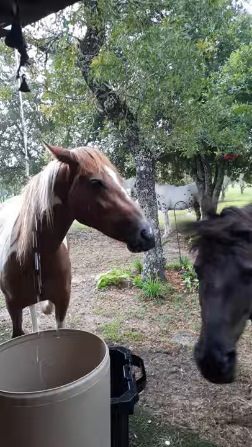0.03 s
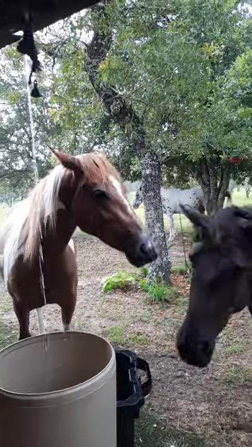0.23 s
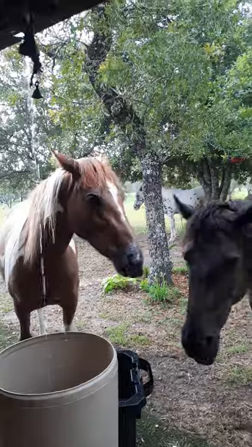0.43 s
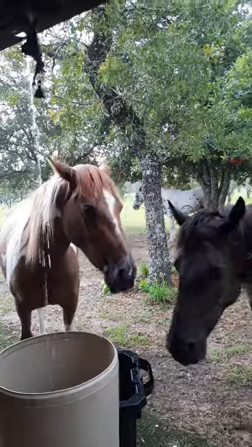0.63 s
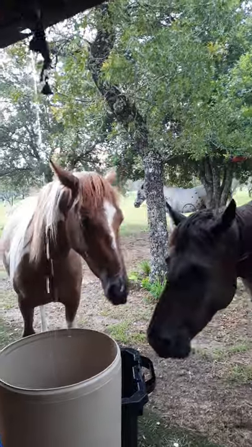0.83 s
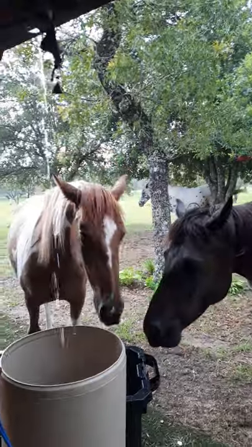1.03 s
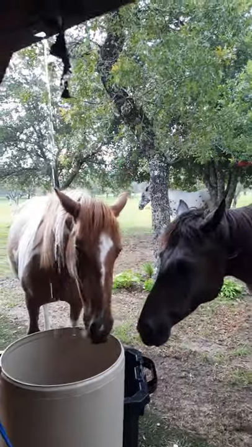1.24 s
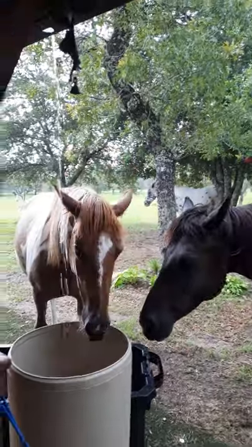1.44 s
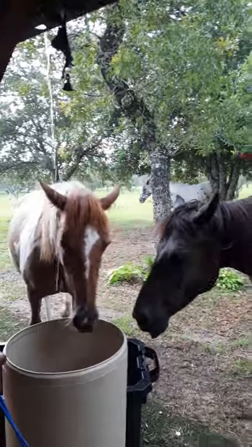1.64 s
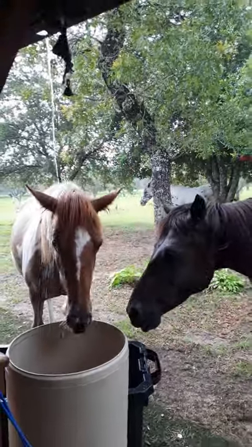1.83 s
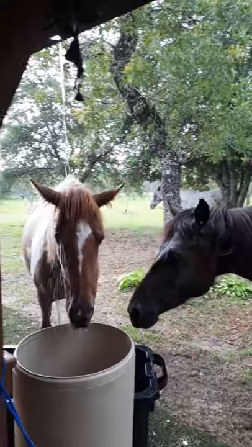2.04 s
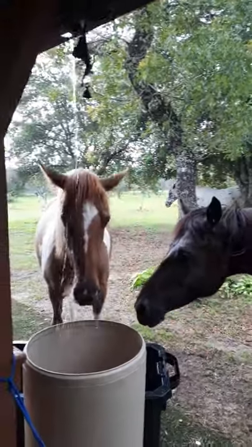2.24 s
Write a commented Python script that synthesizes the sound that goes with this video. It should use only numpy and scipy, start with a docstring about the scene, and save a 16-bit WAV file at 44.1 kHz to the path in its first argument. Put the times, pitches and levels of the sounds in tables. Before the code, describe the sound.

A thin stream of water pours into a plastic barrel, spattering and gurgling over a low, hollow drumming. Midway, a hand knocks twice and rubs beside the left microphone. The splashing thins near the end, in a quiet yard.

```python
"""A thin stream of rainwater falls from a roof into a plastic barrel, which drums under it.
Heard in a wet yard on a hand-held phone, in stereo. The stream breaks into spatters, splashes ring
the barrel, tiny bubbles ping and a few air pockets gulp; near the end the splashing thins out.
Right beside the left microphone, the duller of the two, the hand rubs and knocks twice."""
import sys
import numpy as np
from scipy import signal
from scipy.fft import rfft, irfft
from scipy.io import wavfile
from scipy.ndimage import map_coordinates

SR = 44100
rng = np.random.default_rng(int(sys.argv[2]) if len(sys.argv) > 2 else 0)


def persist_wave(psi):
    """Save psi, clipped to +-1, as 16-bit WAV."""
    counts = np.round(np.clip(psi, -1, 1) * 32767).astype(np.int16)
    wavfile.write(sys.argv[1], SR, np.atleast_2d(counts).T)


N = 101429

# the barrel sounding under the stream: time_s, boom_db, drum_db
DRUMMING_LEVELS = [(.07, -43.5, -45), (.3, -41, -44.5), (.55, -41.5, -45), (.7, -39.5, -42.5),
                   (.9, -39.5, -41.5), (1.1, -42, -45.5), (1.27, -48.5, -48), (1.38, -45.5, -39.5),
                   (1.55, -45, -47.5), (1.76, -44.5, -46.5), (1.83, -44, -45.5), (2.02, -43.5, -47.5),
                   (2.15, -42.5, -45.5), (2.3, -49, -46.5)]
# its deep boom and its higher drumming: frequency_hz, gain_db
BOOM_SPECTRUM = [(25, -27), (45, -7.5), (60, -11), (80, -4), (112, -3), (150, -9.5), (195, -6.5),
                 (235, -16.5), (400, -47)]
DRUM_SPECTRUM = [(120, -29), (200, -5.5), (255, 0.5), (315, 5.5), (360, -4), (392, -0.5), (450, -7.5),
                 (640, -15), (1000, -22), (2000, -71)]
# ringing modes of the barrel: pitch_hz, lift_db, t60_s
BARREL_MODES = [(658, 7, 0.12), (915, -7, .031), (1708, 9, 0.19), (1745, -11, 0.049), (1962, 1.5, 0.085),
                (2250, -40, 0.15), (2560, 3.5, 0.088), (2900, -31, 0.15), (3390, -2.5, 0.068),
                (4660, -7, 0.067), (5750, -4, 0.059), (6635, -2.5, 0.052)]
# strength of the stream's splashing: time_s, level_db
FLOW_LEVELS = [(.07, -39), (.4, -37.5), (.8, -37.5), (.93, -38.5), (1.08, -39.5), (1.4, -37), (1.49, -38.5),
               (1.6, -35), (1.78, -38), (1.88, -39), (1.97, -49.5), (2.3, -49.5)]
# patter of its small drops: frequency_hz, gain_db
STREAM_SPECTRUM = [(200, -7), (500, -7), (850, -0.5), (1250, 1), (1800, 1), (2500, -1.5), (3500, -4.5),
                   (5000, -2.5), (6700, -1), (9500, -11.5), (13000, -1.5), (16000, -3.5)]
# blobs bursting into droplets: start_s, level_db, slap_offset_db, fall_s
SPATTER_HITS = [(0.069, -35.5, 0, 0.021), (.1634, -40.5, 2, 0.018), (0.204, -36, 8.5, .012),
                (.2648, -33.5, -1, .008), (.29, -36, 6, .008), (.309, -34.5, 2, 0.0087),
                (.328, -30.5, 3.5, 0.015), (.3444, -34, 2, .015), (.374, -36.5, 6.5, 0.014),
                (0.447, -29.5, 3.5, 0.0092), (0.503, -29.5, 2.5, 0.01), (0.522, -28, -3, 0.0073),
                (.564, -44, -2, .008), (0.5807, -30.5, -1.5, 0.0091), (0.595, -32, 1, 0.012),
                (0.6195, -31.5, 3, 0.0051), (.645, -34, -1, 0.011), (0.685, -40, 10.5, 0.0055),
                (0.728, -31, -0.5, 0.0084), (0.772, -33, -3, .012), (.786, -37, -1, .015),
                (0.81, -33.5, 8, 0.0087), (0.877, -21, -18, 0.0065), (0.893, -32, -3, .012),
                (0.948, -33, -12, .005), (0.953, -34, 6, 0.016), (1.04, -28.5, -1, 0.014),
                (1.07, -35.5, 8, 0.024), (1.1125, -31, 0, .008), (1.127, -31, 3, 0.014),
                (1.1857, -29, -6, 0.0073), (1.216, -24.5, -2.5, 0.012), (1.243, -34.5, 6.5, 0.013),
                (1.262, -35, 1, .008), (1.3023, -26, -17, 0.0094), (1.323, -25.5, -3.5, 0.019),
                (1.411, -27, 4, 0.011), (1.431, -27, -14, 0.018), (1.506, -28.5, -2, 0.013),
                (1.5258, -24, -1.5, 0.015), (1.557, -33, 10.5, 0.015), (1.5883, -32.5, 2.5, 0.011),
                (1.608, -33, 4, 0.0094), (1.6397, -23.5, -5, 0.0059), (1.6654, -31, 8, 0.0053),
                (1.71, -30.5, -1, 0.025), (1.7378, -23, 3.5, 0.0042), (1.747, -25.5, -2, 0.01),
                (1.789, -29, 1.5, 0.013), (1.826, -30.5, 5.5, 0.012), (1.879, -29, -2.5, 0.028),
                (2.0457, -32.5, -5.5, 0.015)]
# their bright spray and the slap below it: frequency_hz, gain_db
SPRAY_SPECTRUM = [(3000, -12), (7000, -4), (9500, -1), (12500, 11.5), (16000, -2)]
SLAP_SPECTRUM = [(400, -2), (1200, -49), (2500, -17), (4500, 4.5), (6700, 8.5), (8500, 4.5), (14000, -22)]
# the wet yard all around: frequency_hz, gain_db
YARD_SPECTRUM = [(30, 7), (100, -11), (400, 4.5), (700, 1.5), (1300, 3.5), (2200, 2), (4000, -15),
                 (7000, -8.5), (10000, -14.5), (13000, -19), (16000, -69)]
# the hand rubbing beside the left microphone: time_s, level_db
RUB_LEVELS = [(.07, -48), (.65, -45.5), (.78, -47), (.92, -47), (1.03, -38.5), (1.18, -37), (1.3, -35),
              (1.44, -31), (1.5, -46), (1.6, -41), (1.75, -45.5), (2.3, -61.5)]
# tone of that rubbing: frequency_hz, gain_db
RUB_SPECTRUM = [(30, -10), (80, -12), (300, -4), (600, 4.5), (1000, -1.5), (1400, -5.5), (2100, 6.5),
                (3000, -3.5), (4500, -5), (8000, -31), (16000, -48)]
# heavier splashes in the barrel: start_s, level_db, centre_hz, half_width_octaves, fall_s
SPLASH_HITS = [(0.077, -33, 6260, 0.62, 0.017), (0.121, -37.5, 1060, 1.3, 0.028),
               (0.195, -32.5, 2340, 0.51, 0.029), (0.2881, -22, 2650, 0.8, 0.0059),
               (0.298, -32.5, 2370, 0.83, 0.021), (0.394, -33.5, 870, 0.4, 0.0086),
               (0.448, -32, 2400, 0.37, 0.0077), (0.4772, -23.5, 1630, 0.54, 0.016),
               (0.522, -31.5, 1760, 2.7, 0.011), (0.616, -34.5, 1210, 3.2, 0.035),
               (0.645, -36, 1920, 1.6, 0.024), (.686, -39, 8300, 0.11, 0.021),
               (0.769, -35.5, 2500, 0.7, 0.034), (0.787, -26, 5650, 0.55, 0.018),
               (0.807, -26, 2020, 0.77, 0.016), (1.076, -35, 2480, 0.33, 0.024),
               (1.1262, -26.5, 3200, 0.41, 0.0091), (1.213, -37, 2100, 0.92, 0.16),
               (1.301, -28, 2440, 0.21, 0.0064), (1.415, -48, 5500, 0.49, 0.013),
               (1.528, -35.5, 6360, 1.2, 0.026), (1.529, -44, 2570, .4, 0.044),
               (1.606, -38, 3000, 0.46, .014), (1.632, -36.5, 3200, 0.48, 0.017),
               (1.709, -27, 3150, 0.67, 0.0058), (1.72, -33, 2450, 1.2, 0.034),
               (1.777, -30.5, 2020, 0.17, 0.015), (1.823, -36, 3360, 0.36, 0.0098),
               (1.862, -34.5, 7740, 0.26, 0.022), (1.896, -41, 4250, 0.19, 0.02),
               (2.043, -41, 1400, 2.4, 0.035), (2.274, -43.5, 1160, 1.5, 0.026)]
# air trapped in the water: start_s, level_db, pitch_hz, glide_octaves_per_s, fall_s
AIR_POCKETS = [(.203, -33, 950, 10, 0.013), (0.308, -32, 620, 13, 0.018), (0.3149, -24.5, 865, 14, 0.0072),
               (0.452, -34, 370, 2, 0.016), (0.472, -32, 592, 49.5, 0.013), (1.412, -26, 516.5, 6.5, 0.012),
               (1.424, -32.5, 703, 10.5, 0.014), (1.471, -30, 312.5, 18, 0.0045),
               (1.502, -36, 1153, 5.5, 0.017), (1.545, -27, 1800, -7.5, 0.013),
               (1.558, -34.5, 1328, -19.5, 0.014), (1.592, -29, 717, 32, 0.0055)]
# slugs of water beating on the barrel: start_s, level_db, pitch_hz, fall_s
HEAVY_BEATS = [(0.573, -29, 310, 0.019), (0.681, -28.5, 286, 0.019), (1.81, -25, 115.4, 0.018),
               (1.869, -31.5, 135, 0.023), (1.925, -29.5, 115, 0.027), (1.955, -32.5, 55, 0.052),
               (1.988, -30, 131.5, 0.024), (2.038, -31, 109, 0.011), (2.215, -38.5, 257.6, 0.077),
               (2.238, -36, 186, 0.037)]
# the hand knocking the phone: start_s, click_db, first_hz, last_hz, pitch_drop_s, fall_s,
# lowpass_hz, thud_db, thud_hz, thud_fall_s
HAND_KNOCKS = [(0.8742, 1, 2820, 346, 0.00043, 0.0014, 4200, -18, 78, 0.015),
               (0.9566, -2, 1220, 125, 0.00067, 0.0047, 960, -10, 72.4, 0.0176)]
# dull response of the left microphone: frequency_hz, gain_db
LEFT_MIC_RESPONSE = [(30, -0.5), (600, 3.5), (2200, -3.5), (4000, 2), (6500, -9.5), (7800, -21.5),
                     (9200, -27), (11000, -16), (13000, -16), (16000, -16)]

PINGS_PER_S, PING_LOW_HZ, PING_HIGH_HZ, PING_DECAY_CYCLES = 300, 1502, 15420, 15.4
PING_DB, PING_SCATTER_DB, PING_TILT_DB_PER_OCTAVE, PING_GLIDE = -6.5, 2, -1.5, 0.036
TICK_DB, SPRAY_DB, SLAP_DB = -6.5, -6.5, -5.5
YARD_DB = -47
FROTH_DEPTH, FROTH_PER_S, GULP_RIGHT_DB = .65, 440, -3.5
LEFT_LAG_S, SOUND_START_S, LOW_CUT_HZ, HIGH_CUT_HZ = .00029, .069, 36, 16150


def undb(db):
    """Decibels to gain."""
    return 10 ** (np.asarray(db) / 20)


def unit(x):
    """Scale to rms 1."""
    return x / np.sqrt(np.mean(x ** 2) + 1e-20)


def curve(rows, column=1):
    """Gain over time from a column of dB."""
    rows = np.array(rows)
    return undb(np.interp(np.arange(N) / SR, rows[:, 0], rows[:, column]))


def octaves():
    """Octave position of each spectral bin."""
    return np.log2(np.maximum(np.arange(N + 1) * SR / (2 * N), 1))


def colour(x, points):
    """Filter by a spectrum of (Hz, dB) points."""
    hz, db = np.array(points).T
    gain = undb(np.interp(octaves(), np.log2(hz), db))
    return irfft(rfft(x, 2 * N) * gain)[..., :N]


def pair(x, likeness):
    """Left and right from three unrelated signals, the third reaching both microphones."""
    return np.sqrt(1 - likeness) * x[:2] + np.sqrt(likeness) * x[2]


def drops(per_s, scatter_db, likeness):
    """Stereo clicks of many drops of uneven size."""
    hit = rng.random((3, N)) < per_s / SR
    size = undb(scatter_db * np.minimum(rng.exponential(size=(3, N)), 5))
    return unit(pair(hit * size * rng.standard_normal((3, N)), likeness))


def wander(per_s):
    """A smooth random wavering with rms 1."""
    return unit(map_coordinates(rng.standard_normal(4096), [np.arange(N) / SR * per_s], mode="wrap"))


def since(start):
    """Seconds since a moment, 0 before it."""
    return np.maximum(np.arange(N) / SR - start, 0)


def burst(start, rise_s, fall_s):
    """Quick attack, exponential release."""
    age = since(start)
    return (1 - np.exp(-age / rise_s)) * np.exp(-age / fall_s)


def drumming():
    """Falling water beats on the barrel, which booms almost alike at both microphones."""
    boom = unit(colour(drops(per_s=1500, scatter_db=2.5, likeness=0.97), BOOM_SPECTRUM))
    drum = unit(colour(drops(per_s=900, scatter_db=0.5, likeness=1.0), DRUM_SPECTRUM))
    return boom * curve(DRUMMING_LEVELS, column=1) + drum * curve(DRUMMING_LEVELS, column=2)


def barrel(x):
    """Add the ringing of the barrel; each mode meets each microphone at its own phase."""
    t = np.arange(SR // 4) / SR
    ring = np.zeros((2, len(t)))
    for hz, db, t60 in BARREL_MODES:
        decay = np.log(1000) / t60
        phase = 2 * np.pi * hz * t + rng.uniform(-1.1, 1, (2, 1))
        ring += 2 * undb(db) * decay / SR * np.exp(-decay * t) * np.cos(phase)
    return x + signal.fftconvolve(x, ring, axes=1)[:, :N]


def stream():
    """Dense small drops, wide in the stereo image, flutter as the stream breaks up."""
    patter = drops(per_s=7000, scatter_db=2.0, likeness=0.15)
    flutter = undb(2.8 * wander(per_s=90))
    return unit(barrel(colour(patter * flutter, STREAM_SPECTRUM))) * curve(FLOW_LEVELS)


def pings():
    """Tiny bubbles ring briefly to left and right, as loud as the stream is strong."""
    out, age = np.zeros((2, N + 4096)), np.arange(4096) / SR
    for when, pitch, size, side, lag in rng.random((int(PINGS_PER_S * N / SR), 5)):
        hz = PING_LOW_HZ * (PING_HIGH_HZ / PING_LOW_HZ) ** pitch
        life = age * hz / PING_DECAY_CYCLES
        db = -PING_SCATTER_DB * np.log(size + 0.1) + PING_TILT_DB_PER_OCTAVE * np.log2(hz / PING_LOW_HZ)
        cycles = hz * age * (1 + PING_GLIDE * np.minimum(life, 2) / 2)
        tone = np.sin(2 * np.pi * (cycles + np.array([[0], [lag]])))
        pan = np.sqrt([[.5 + side], [1.5 - side]])
        start = int(when * N)
        out[:, start:start + len(age)] += undb(db) * pan * np.exp(-life) * tone
    return unit(barrel(out[:, :N])) * undb(PING_DB) * curve(FLOW_LEVELS)


def spatters():
    """Each blob lands with a tick, bursts into bright spray and rings the barrel with its slap."""
    spray_power, slap_power = 0, 0
    for start, db, slap_offset_db, fall in SPATTER_HITS:
        tick = undb(TICK_DB) * burst(start, rise_s=0.0001, fall_s=0.001)
        power = (undb(db) * (tick + burst(start, rise_s=0.00073, fall_s=fall))) ** 2
        spray_power += power
        slap_power += power * undb(slap_offset_db) ** 2
    spray = unit(colour(drops(per_s=4000, scatter_db=3, likeness=0.24), SPRAY_SPECTRUM))
    slap = unit(colour(drops(per_s=7600, scatter_db=-0.5, likeness=0.45), SLAP_SPECTRUM))
    ringing_slap = barrel(undb(SLAP_DB) * slap * np.sqrt(slap_power))
    return undb(SPRAY_DB) * spray * np.sqrt(spray_power) + ringing_slap


def yard():
    """The wet yard lies behind the water as a faint, steady wash."""
    wash = pair(rng.standard_normal((3, N)), likeness=0.33)
    return undb(YARD_DB) * unit(colour(wash, YARD_SPECTRUM))


def rubbing():
    """The hand rubs lightly and unevenly on the phone."""
    friction = unit(colour(rng.standard_normal(N), RUB_SPECTRUM))
    return friction * curve(RUB_LEVELS) * undb(1.8 * wander(per_s=45.08))


def splashes():
    """Heavier blobs splash, each in a band of its own, and ring the barrel."""
    spectrum = rfft(drops(per_s=9900, scatter_db=3.0, likeness=0.25), 2 * N)
    out = 0
    for start, db, hz, half_width, fall in SPLASH_HITS:
        band = 1 / (1 + ((octaves() - np.log2(hz)) / half_width) ** 2) ** 2.08
        splash = unit(irfft(spectrum * band)[:, :N])
        out += undb(db) * burst(start, rise_s=0.0012, fall_s=fall) * splash
    return barrel(out)


def gulps():
    """Trapped air rings briefly, mostly rising in pitch; the froth around it makes it rough."""
    out = 0
    for start, db, hz, glide, fall in AIR_POCKETS:
        pitch = hz * 2 ** (glide * np.minimum(since(start), .04))
        froth = np.array([wander(FROTH_PER_S) + 1j * wander(FROTH_PER_S) for _ in range(2)])
        tone = np.exp(2j * np.pi * np.cumsum(pitch) / SR) * (1 + FROTH_DEPTH * froth)
        out += undb(db) * burst(start, rise_s=0.0034, fall_s=fall) * np.sqrt(2) * unit(tone.imag)
    return out * undb([[0], [GULP_RIGHT_DB]])


def beats():
    """A heavier slug of water sets the barrel throbbing for a few cycles."""
    out = 0
    for start, db, hz, fall in HEAVY_BEATS:
        throb = np.sin(2 * np.pi * hz * since(start))
        out += undb(db) * burst(start, rise_s=0.0063, fall_s=fall) * throb
    return out


def knocks():
    """The hand knocks the phone twice, each time a click that drops into a thud."""
    out = 0
    for start, db, first_hz, last_hz, drop, fall, lowpass_hz, thud_db, thud_hz, thud_fall in HAND_KNOCKS:
        age = since(start)
        cycles = last_hz * age + (first_hz - last_hz) * drop * (1 - np.exp(-age / drop))
        click = undb(db) * burst(start, rise_s=0.00014, fall_s=fall) * np.sin(2 * np.pi * cycles)
        out += signal.sosfilt(signal.butter(3, lowpass_hz, fs=SR, output="sos"), click)
        thud = np.sin(2 * np.pi * thud_hz * age)
        out += undb(thud_db) * burst(start, rise_s=0.0058, fall_s=thud_fall) * thud
    return out


def scene():
    """Water and yard reach both microphones, the left later and duller; only the left hears the hand."""
    left, right = yard() + drumming() + stream() + pings() + spatters() + splashes() + gulps() + beats()
    left = colour(np.roll(left, round(LEFT_LAG_S * SR)), LEFT_MIC_RESPONSE)
    return np.array([left + rubbing() + knocks(), right])


def record(dry):
    """The sound starts abruptly after a brief silence; the phone cuts the deepest bass and the top."""
    fade_in = np.minimum(since(SOUND_START_S) / .001, 1)
    low_cut = signal.butter(3, LOW_CUT_HZ, "high", fs=SR, output="sos")
    high_cut = signal.ellip(10, .2, 75, HIGH_CUT_HZ, fs=SR, output="sos")
    return signal.sosfilt(high_cut, signal.sosfilt(low_cut, dry * fade_in))


dry = scene()
out = record(dry)
persist_wave(out)
```